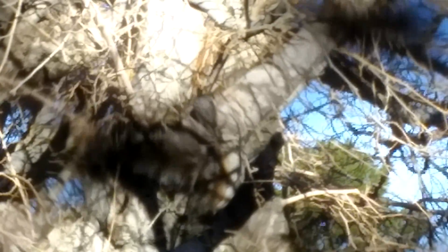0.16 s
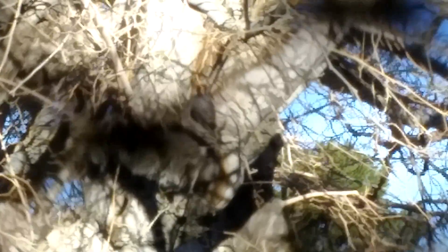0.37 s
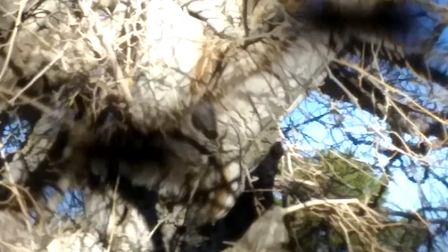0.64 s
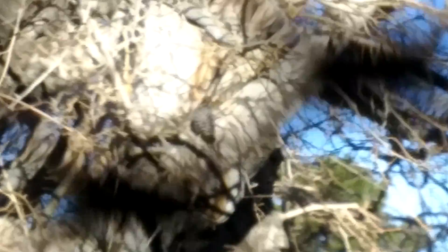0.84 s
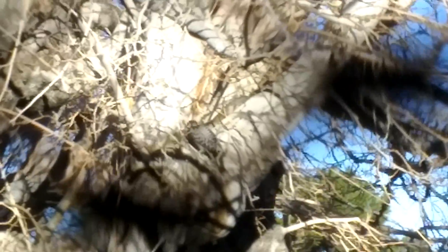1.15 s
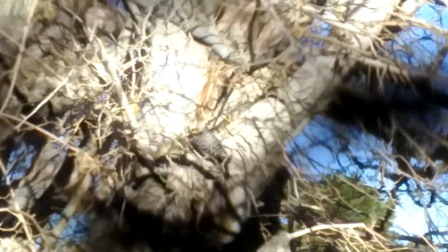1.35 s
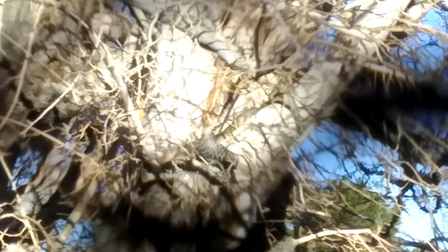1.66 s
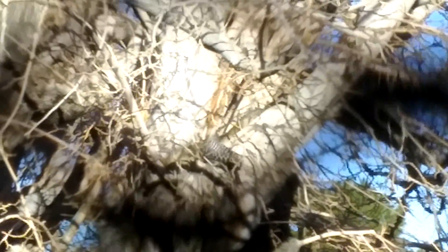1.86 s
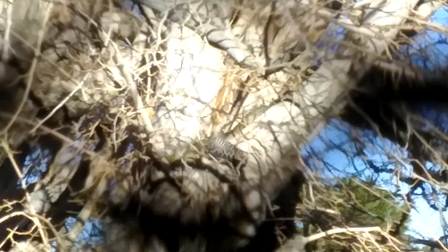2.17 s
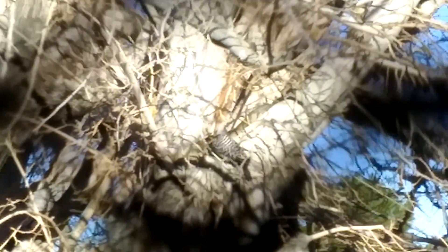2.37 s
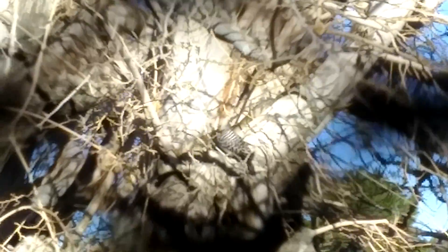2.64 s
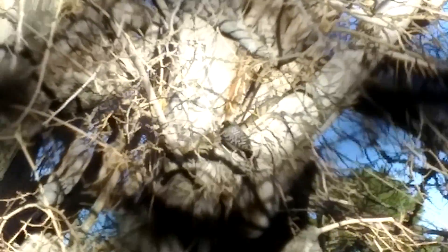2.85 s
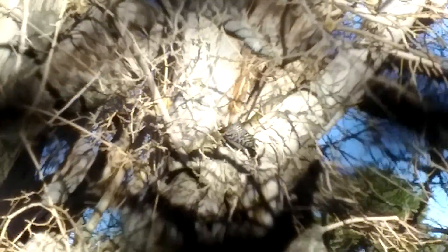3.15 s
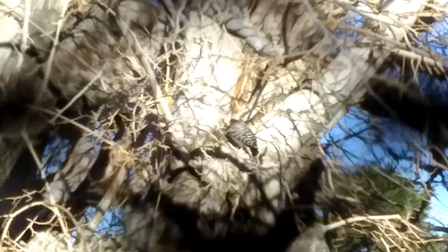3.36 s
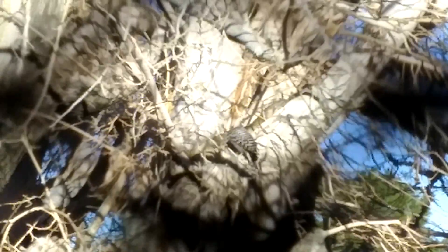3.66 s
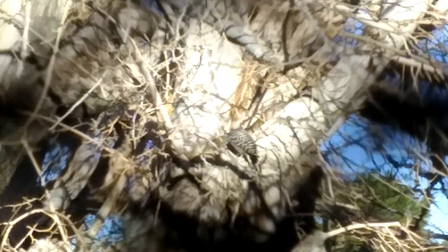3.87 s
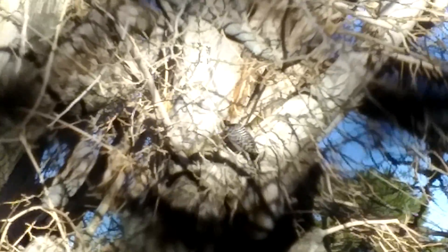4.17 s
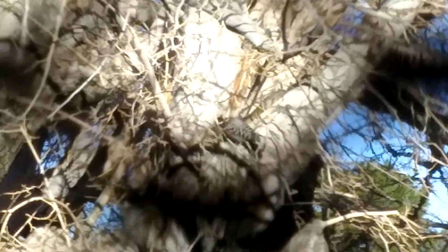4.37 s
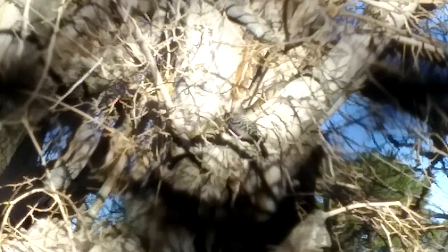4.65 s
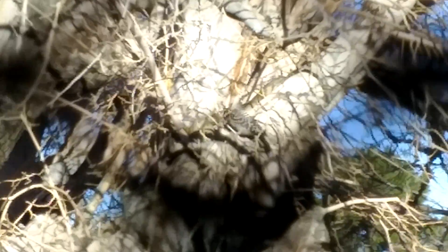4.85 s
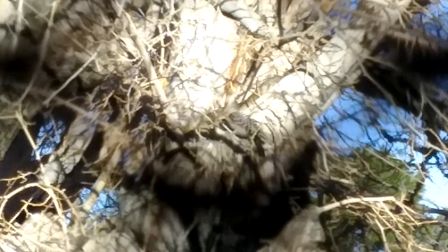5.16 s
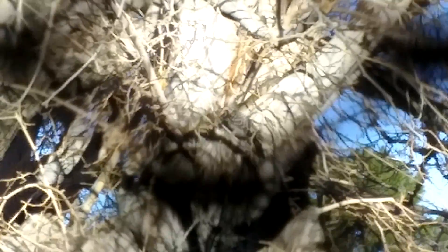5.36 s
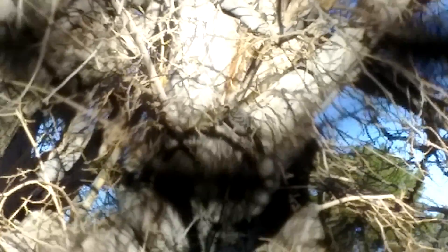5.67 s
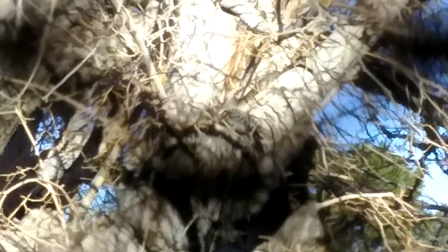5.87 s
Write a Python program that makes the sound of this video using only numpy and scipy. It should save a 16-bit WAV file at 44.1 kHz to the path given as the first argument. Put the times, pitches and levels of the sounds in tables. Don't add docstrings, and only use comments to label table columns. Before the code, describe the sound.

A handheld camera outdoors among bare branches picks up bird chirps some way off, mostly at the start and end. Separate dull wooden pecks, a brief scrape of dry twigs and soft low moans of air come between them. Handling noise on the plastic body peaks in one hard bright click near the middle, over thin hissing air and a faint hum.

```python
import sys
import numpy as np
from scipy import signal
from scipy.io import wavfile
from scipy.ndimage import uniform_filter1d

SR = 44100
rng = np.random.default_rng(int(sys.argv[2]) if len(sys.argv) > 2 else 0)


def to_wav(sig):
    pcm = np.clip(np.atleast_2d(sig), -1, 1) * 32767
    pcm = np.round(pcm).astype(np.int16)
    wavfile.write(sys.argv[1], SR, pcm.T)


def magnitude_from_level(level_db):
    exponent = np.asarray(level_db, float) / 20
    return 10 ** exponent


N = 265173


def songbird():
    direct, far, deep = np.zeros((3, N))
    near_song(direct, deep)
    twisting_calls(direct, deep)
    far_birds(far, deep)
    near = magnitude_from_level(-2) * direct + magnitude_from_level(-5.5) * woodland(direct, t60=.11)
    return near + woodland(far, t60=0.083) + woodland(deep, t60=.17)


# length_share, way_share (first to second pitch), level_db, warble_depth_hz
HOLD_SHAPE = [(0, 0, -10, 15), (.42, .3, 0, 15), (.75, .62, -3, 30), (1, 1, -7, 40)]
HISS_SHAPE = [(0, 0, 2, 800), (.5, 0.68, -1, 700), (1, 0.68, -1, 596)]
SLIDE_SHAPE = [(0, 0.13, -3.5, 50), (.3, .15, -0.5, 100), (.7, .85, -1.5, 120), (1, 0.99, -2, 60)]
TURN_SHAPE = [(0, 0.043, -3, 50.7), (.2, 0.31, 0, 80), (.4, 0.97, -5, 122), (.65, 0.43, -1, 156),
              (.85, -0.097, -2.5, 87.5), (1, -0.56, -32, 80)]
BURR_SHAPE = [(0, 0, -5, 180), (.4, .4, 0, 340), (.75, .8, -1, 340), (1, 1, -4, 250)]
SWELL_SHAPE = [(0, 0.143, -20.5, 40), (.35, 0.3, -3, 111), (.7, .85, 2, 150), (1, 0.74, -5, 120)]
# start_s, length_s, level_db, first_pitch_hz, second_pitch_hz
HOLDS = [(0.122, 0.024, -40, 3080, 3210), (0.196, 0.078, -41.5, 3100, 2970),
         (0.436, 0.028, -44, 3155, 2970), (0.571, 0.035, -44.5, 2990, 3130),
         (0.669, 0.078, -45.5, 3103, 2890), (0.889, 0.037, -43, 3110, 3380),
         (4.906, 0.037, -61, 3710, 3550), (4.958, 0.03, -54.5, 3270, 3050),
         (5.042, 0.035, -45.5, 4350, 4360), (5.169, 0.045, -49, 3777, 3673),
         (5.196, 0.068, -57, 3623, 3650), (5.276, 0.046, -48, 4310, 3990), (5.31, 0.037, -48.5, 3500, 3240),
         (5.38, 0.035, -43.5, 3260, 3000), (5.821, 0.023, -42.5, 4175, 4160),
         (5.854, 0.029, -43.5, 3573, 3210), (5.93, 0.043, -56, 5000, 5030),
         (5.937, 0.05, -48.5, 3737, 3717), (2.91, .024, -48, 5130, 5230), (2.897, .014, -53, 5150, 5200),
         (0.61, 0.02, -53, 3105, 3000), (1.69, .025, -61.5, 3780, 3600), (5.812, .03, -54, 3570, 3500),
         (5.724, 0.0345, -42, 3096, 3520)]
HISSES = [
    (.92, .035, -64, 6400, 7100),
    (.975, .035, -67, 7100, 6700),
    (.925, .028, -71, 9500, 10000),
    (.988, .022, -70, 9900, 9500),
    (2.915, .04, -74, 10500, 11200),
]
HOARSE = [
    (2.9, .035, -58, 5050, 5400),
    (2.955, .06, -57, 4800, 4300),
    (3.03, .05, -60, 3900, 3400),
    (5.53, .05, -54, 4700, 5500),
    (5.56, .08, -49.5, 4300, 3900),
    (5.548, .045, -61, 3000, 2600),
    (5.63, .05, -56, 4100, 3700),
]
SLIDES = [(0, .038, -40, 3120, 3350), (0.08, 0.048, -49, 3070, 2775), (0.25, 0.055, -53.5, 2950, 2000),
          (.285, .045, -58, 2100, 1930), (0.4, 0.04, -54, 2800, 3450), (0.54, 0.04, -51.5, 3190, 2780),
          (0.733, 0.05, -55, 2910, 2010), (0.872, 0.035, -52, 2970, 3500),
          (1.023, 0.046, -48.5, 4110, 2860), (1.075, 0.03, -50, 3140, 3510),
          (1.792, 0.038, -61.5, 3280, 2340), (2.004, 0.12, -67, 4070, 2900),
          (2.236, 0.071, -63.5, 4400, 2370), (2.643, 0.039, -66, 2900, 2300),
          (4.928, 0.027, -55, 3530, 4640), (4.945, .025, -57, 4400, 3200),
          (5.062, 0.072, -55.5, 4075, 3240), (5.262, .03, -56, 2900, 4000), (5.403, .045, -58, 3000, 2320),
          (5.69, 0.029, -45, 3440, 2784), (5.81, 0.021, -55, 3380, 4170), (5.838, .025, -47, 4145, 3500),
          (5.91, 0.019, -57, 4410, 5100), (5.926, 0.032, -50.5, 4600, 3700)]
TURNS = [
    (.435, 0.0318, -48, 3290, 3830),
]
BURRS = [
    (0, .05, -48, 3500, 3400),
    (5.068, .055, -51, 4100, 3600),
    (4.933, .05, -55, 4300, 3900),
    (3.045, .06, -61, 3100, 3000),
    (.98, .04, -54, 3000, 2950),
    (5.292, .045, -51, 4100, 3550),
    (5.34, .05, -52, 3600, 3050),
    (5.508, .045, -49, 3800, 4100),
    (5.525, .04, -48, 4000, 4250),
    (5.53, .05, -54, 4800, 5300),
]
NASALS = [
    (2.878, .058, -52, 2250, 2880),
    (5.485, .04, -62, 2500, 2450),
    (5.525, .05, -57, 2250, 3100),
]


def near_song(direct, deep):
    for shape, notes in ((HOLD_SHAPE, HOLDS), (HISS_SHAPE, HISSES + HOARSE), (SLIDE_SHAPE, SLIDES),
                         (TURN_SHAPE, TURNS), (BURR_SHAPE, BURRS)):
        for row in notes:
            start, note = whistle(syllable(shape, *row), octave_db=-41)
            add(direct, start, note)
            if shape is SLIDE_SHAPE:
                add(deep, start, magnitude_from_level(-9) * note)
    for row in NASALS:
        add(direct, *whistle(syllable(SWELL_SHAPE, *row), octave_db=5.5))


# time_s, pitch_hz, level_db, warble_depth_hz
SQUAWK = [(2.926, 3114, -55, 40), (2.939, 3940, -37, 60), (2.946, 5060, -46, 60), (2.953, 4600, -44, 60),
          (2.961, 3855, -35.5, 50), (2.973, 3340, -47.5, 70), (2.99, 3380, -50, 90)]
SQUAWK_END = [(2.988, 3900, -50, 60), (2.996, 3815, -44, 60), (3.004, 3380, -45, 60),
              (3.015, 3470, -49, 60), (3.027, 3940, -43.5, 70), (3.033, 4170, -50, 70),
              (3.039, 3430, -47, 70), (3.062, 3300, -56, 90)]
RASP = [(5.538, 4320, -50, 120), (5.555, 4520, -39.5, 140), (5.573, 3630, -41, 120),
        (5.585, 3910, -35, 110), (5.597, 4460, -43, 80), (5.63, 4390, -44, 90), (5.66, 4280, -52, 120)]
RASP_END = [(5.59, 4030, -49, 60), (5.605, 3910, -40, 60), (5.625, 3680, -40.5, 80), (5.639, 3565, -43, 90),
            (5.654, 3290, -49.5, 140), (5.685, 3430, -51, 160)]


def twisting_calls(direct, deep):
    for call in (SQUAWK, SQUAWK_END, RASP, RASP_END):
        start, note = whistle(call, octave_db=-43)
        add(direct, start, note)
        add(deep, start, magnitude_from_level(-13) * note)


# start_s, length_s, level_db, first_pitch_hz, second_pitch_hz
FAR_NOTES = [(.005, 0.042, -58, 4480, 3700), (.42, 0.093, -59, 3890, 3630), (.755, 0.1, -54, 2880, 3150),
             (.86, 0.088, -61, 3870, 4180), (.91, 0.029, -53, 3630, 3050), (0.98, 0.037, -61.5, 4200, 4400),
             (1.02, 0.06, -57, 4150, 3930), (1.17, 0.05, -66, 3600, 2240), (1.505, 0.05, -63.5, 3330, 3580),
             (1.63, 0.06, -64, 2900, 2850), (1.601, 0.12, -66.5, 4300, 3680),
             (2.5, 0.062, -66.5, 2800, 2400), (2.77, 0.14, -68, 3560, 3590),
             (2.953, 0.089, -57, 5300, 3950), (2.95, 0.062, -58, 2900, 3000),
             (3.53, 0.068, -64.5, 4200, 3750), (4.37, .07, -62, 4020, 3750),
             (5.548, 0.043, -55.5, 3100, 2580), (5.845, .04, -53, 4130, 3810),
             (4.77, 0.05, -61, 3850, 3730), (4.93, 0.045, -57, 4300, 4550), (5.045, 0.073, -65, 4800, 4530),
             (5.371, 0.065, -58, 4010, 3480), (5.709, 0.027, -50, 4040, 3935)]
# length_share, way_share, level_db, warble_depth_hz
FLICK_SHAPE = [(0, .1, 0, 80), (.13, .2, 2, 120), (.2, .9, -4, 200), (.28, .5, -2, 180), (.36, .1, 1, 120),
               (.46, -.15, -2, 140), (.56, -.4, -13, 160), (.8, -.8, -6, 200), (1, -.6, -13, 200)]
# start_s, length_s, level_db, first_pitch_hz, second_pitch_hz
FLICKS = [
    (1.548, .1, -55, 3500, 4450),
    (2.432, .095, -60, 3500, 4400),
    (3.482, .1, -56, 3500, 4440),
    (4.33, 0.094, -59, 3750, 4400),
]


def far_birds(far, deep):
    for shape, notes, place in ((BURR_SHAPE, FAR_NOTES, far), (FLICK_SHAPE, FLICKS, deep)):
        for row in notes:
            add(place, *whistle(syllable(shape, *row), octave_db=-56))


def syllable(shape, start, length, db, first_hz, second_hz):
    return [(start + share * length, first_hz + way * (second_hz - first_hz), db + shape_db, depth)
            for share, way, shape_db, depth in shape]


def whistle(rows, octave_db):
    t, (hz, db, depth) = curves(rows)
    drift, flutter = (wander(N // 8, smooth)[:len(t)] for smooth in (150, 90))
    rasp = .3 * wander(N // 8, smooth=25)[:len(t)]
    warble_hz = 125.66 * (1 + .35 * drift)
    warble = np.sin(2 * np.pi * np.cumsum(warble_hz) / SR) + rasp
    phase = 2 * np.pi * np.cumsum(uniform_filter1d(hz, size=150) + depth * warble) / SR
    tone = np.sin(phase) + magnitude_from_level(octave_db) * np.sin(2 * phase)
    return t[0], magnitude_from_level(db + 2.5 * flutter) * evened(tone) * signal.windows.tukey(len(t), .36)


def woodland(x, t60):
    taps = np.zeros(SR // 3)
    at = np.arange(60, len(taps) - 30, 30)
    taps[at + rng.integers(0, 30, len(at))] = rng.choice([-1., 1.], len(at))
    t = np.arange(len(taps)) / SR
    decay = magnitude_from_level(-60 * t / t60) + 0.18 * magnitude_from_level(-20 * t / t60)
    taps *= decay * (1 - np.exp(-t / 0.0018))
    return signal.fftconvolve(x, taps / np.linalg.norm(taps))[:len(x)]


# time_s, blow_db, bark_db, scatter_db, top_khz
PECKS = [
    (0.017, -27, -19.5, -13, 3.35),
    (0.505, -44.5, -14, -16, 2.6),
    (0.7464, -30.5, -32, -8, 3),
    (1.107, -56, -28, -16, 4.6),
    (1.216, -53.5, -18, -2, 2),
    (1.327, -27, -19.5, -21, 2.67),
    (3.119, -44, -15, -36, 1.9),
    (4.521, -34.5, -12, -27, 1.86),
    (5.374, -49.5, -13.5, -1, 3.1),
    (5.737, -43, -26, -12, 3.4),
]
# pitch_hz, level_db, t60_s
LIMB = [(803, -15.5, 0.04), (1104, 2.5, 0.02), (1263, -15, 0.025)]
# pitch_hz, level_db, t60_s
BARK = [(1900, -13.5, 0.028), (2240, 3, 0.087), (2900, -1, 0.17), (3500, 4, 0.13), (1600, -38, 0.09)]


def woodpecker():
    out, t = np.zeros(N), np.arange(SR // 5) / SR
    for s, db, bark_db, scatter_db, top_khz in PECKS:
        tune = rng.uniform(0.913, 1.048, 8)
        chatter = rng.standard_normal(len(t)) * (rng.random(len(t)) < .12)
        limb, bark = np.zeros((2, len(t)))
        for (hz, mode_db, t60), k in zip(LIMB, tune):
            limb += magnitude_from_level(mode_db - 60 * t / t60) * np.sin(2 * np.pi * hz * k * t)
        for (hz, mode_db, t60), k in zip(BARK, tune):
            bark += magnitude_from_level(mode_db - 60 * t / t60) * evened(resonate(chatter, hz * k, 650))
        blow = (limb + magnitude_from_level(bark_db) * bark) * (1 - np.exp(-t / 0.0008))
        scattered = blow + magnitude_from_level(scatter_db) * woodland(blow, t60=0.17)
        add(out, s, magnitude_from_level(db) * dull(scattered, 1000 * top_khz))
    return out


# pitch_hz, width_hz, late_ring_strength
TRAPS = [(4000, 205, 2.2), (4000, 205, 2.2), (12250, 60, 1.2)]


def shell():
    out = np.zeros(N)
    finger_thumps(out)
    panel_knocks(out)
    nail_snaps(out)
    for hz, width, strength in TRAPS:
        out = out - strength * resonate(out, hz, width)
    return out - .6 * resonate(out, 8400, 1800)


# time_s, level_db,
# pitch_hz, spread_s
THUMPS = [(0.6772, -33.5, 575, 0.0041), (2.008, -42, 2020, 0.0046), (2.1586, -38, 970, 0.0036),
          (2.1614, -30, 1000, 0.00043), (2.161, -37.5, 246, 0.0017), (2.354, -43.5, 301, 0.019),
          (2.418, -35, 285, 0.0063), (2.42, -42, 710, 0.002), (2.4186, -18, 5500, 0.0003),
          (2.6924, -36, 2300, 0.0008), (2.699, -48, 400, .003), (4.4564, -40, 1490, 0.0052),
          (4.458, -27, 1860, 0.00099), (4.4582, -36, 800, 0.00037), (0.7472, -35, 1030, 0.00072),
          (5.196, -35.5, 267, 0.0028), (5.197, -40, 1976, 0.003)]


def finger_thumps(out):
    for s, db, hz, spread in THUMPS:
        slips = np.diff(slipping(spread), prepend=0)
        width = 300 + 0.38 * hz
        thump = dull(resonate(resonate(slips, hz, width), hz, width), min(4.8 * hz, SR / 3))
        add(out, s, magnitude_from_level(db) * thump / abs(thump).max())


# time_s, level_db, pitch_hz, t60_s
KNOCKS = [(2.4188, -13, 760, .007), (2.4182, -17, 1650, .005), (2.4186, -21, 1150, .007),
          (2.4195, -36, 260, .03), (2.6932, -35, 190, .025), (2.6931, -29.5, 1050, .012),
          (2.6936, -37, 520, .012), (4.4585, -33, 720, .006), (4.4588, -32, 240, .018),
          (2.1612, -38, 240, .015), (5.592, -43, 300, .03), (2.1587, -41, 1000, .02),
          (2.159, -40, 1900, .012), (2.1595, -41, 2850, .012), (2.1619, -30, 4750, .006),
          (.677, -40, 400, .02), (.7465, -40, 480, .02), (.7468, -38, 1400, .012), (5.196, -38, 260, .025),
          (4.459, -38, 400, .015)]


def panel_knocks(out):
    t = np.arange(2000) / SR
    for s, db, hz, t60 in KNOCKS:
        ring = magnitude_from_level(db - 60 * t / t60) * np.sin(2 * np.pi * hz * t)
        add(out, s, thin(ring * (1 - np.exp(-t / .00015)), .4 * hz))


# time_s, snap_db, tick_db, spread_s
SNAPS = [
    (1.497, -41, -62, 0.0022),
    (2.159, -40, -68, 0.0014),
    (2.1618, -32, -48, 0.00011),
    (2.354, -47, -52, 0.013),
    (2.4181, -41, -15.5, 0.00004),
    (2.4184, -0.5, -42, 0.00015),
    (2.693, -39, -76, 0.00064),
    (4.031, -51, -70, 0.0013),
    (4.458, -24.5, -51, 0.00094),
]
# pitch_hz, width_hz, level_db
SNAP_MODES = [(3780, 980, 0), (4050, 1600, 0), (4450, 1240, 0)]
# low_hz, high_hz
TICK_BAND = (10100, 14200)


def nail_snaps(out):
    for s, snap_db, tick_db, spread in SNAPS:
        slips, snap = slipping(spread), np.zeros(2000)
        for k, (hz, width, db) in enumerate(SNAP_MODES):
            snap += (-1) ** k * magnitude_from_level(db) * resonate(resonate(slips, hz, width), hz, width)
        tick = signal.sosfilt(signal.butter(2, TICK_BAND, "band", fs=SR, output="sos"), slips)
        for db, ring in ((snap_db, snap), (tick_db, tick)):
            add(out, s, magnitude_from_level(db) * ring / abs(ring).max())


def slipping(spread):
    slips, (when, size) = np.zeros(2000), rng.random((2, 5))
    slips[(np.clip(when * spread, 0, .03) * SR).astype(int)] = 2 * size - 1
    slips[0] = -1
    return slips


# time_s, level_db
RUSTLE = [
    (.745, -64),
    (.755, -53),
    (.84, -54.5),
    (.974, -60),
    (1.15, -66),
]


def twigs():
    t, (db,) = curves(RUSTLE)
    snaps = (rng.random(len(t)) < 900 / SR) * rng.standard_normal(len(t))
    wood = resonate(resonate(snaps, 730, 1150), 860, 1200) + 1.2 * resonate(snaps, 1440, 120)
    out = np.zeros(N)
    add(out, t[0], magnitude_from_level(db - 1.5) * evened(wood))
    return dull(out, hz=3000)


# start_s, length_s, level_db, first_pitch_hz, second_pitch_hz
MOANS = [
    (1.77, 0.18, -55.5, 219, 252),
    (2.012, 0.037, -54, 353, 355),
    (2.062, 0.12, -55, 403, 422),
    (2.2, .06, -61, 450, 440),
    (3.87, 0.095, -61.5, 453, 482),
    (3.98, 0.18, -57, 436, 463),
]


def moans():
    out = np.zeros(N)
    for row in MOANS:
        t, (hz, db, _) = curves(syllable(SLIDE_SHAPE, *row))
        tone = np.sqrt(2) * np.sin(2 * np.pi * np.cumsum(hz) / SR)
        unsteady = magnitude_from_level(db + 2.8 * wander(len(t), smooth=250))
        add(out, t[0], unsteady * tone * signal.windows.tukey(len(t), .6))
    return out


# pitch_hz, level_db (per Hz)
AIR_COLOUR = [(15, -42), (40, -42), (70, -3.5), (130, 2), (260, -6.5), (400, -9), (900, -13.5), (2000, -16),
              (4500, -18), (6500, -24), (8200, -29.5), (11000, -31.5), (14000, -33.5), (15600, -32)]
# time_s, level_db
GUST = [(0, 5), (.4, 2.5), (.8, 3), (1.2, 3), (1.6, 5), (2.0, 2.8), (2.4, 2.5), (2.8, 3), (3.2, 4),
        (3.6, 2.6), (4.0, 4), (4.25, 2.5), (4.6, 1), (4.9, 6.5), (5.15, 6), (5.25, 1.5), (5.6, 5.5),
        (6.01, 4)]


def air():
    frames, hz = N // 256 + 5, np.fft.rfftfreq(1024, 1 / SR)
    a, b, patches = rng.standard_normal((frames, 513, 3)).T
    patches = evened(uniform_filter1d(uniform_filter1d(patches, size=12, axis=0), size=8, axis=1))
    f, level_db = np.transpose(AIR_COLOUR)
    colour_db = np.interp(np.log(hz + 1), np.log(f + 1), level_db)[:, None]
    hz = hz[:, None]
    swell_db = np.interp(np.arange(frames) * 256 / SR, *np.transpose(GUST))
    swell_db = swell_db / (1 + (hz / 7000) ** 4)
    patch_db = (1.0 + 1.7 / (1 + (hz / 400) ** 2)) * patches
    flicker_db = 0.75 * wander(frames, smooth=1)
    z = (a + 1j * b) * magnitude_from_level(colour_db + patch_db + flicker_db + swell_db)
    z *= hz < 15720
    return magnitude_from_level(-58) * evened(signal.istft(z, nperseg=1024, noverlap=768)[1][:N])


# pitch_hz, level_db
HUM = [(118.4, -75.5), (183.0, -72), (258.4, -71), (296.1, -73.5), (355.3, -77), (527.6, -81),
       (942.1, -68.5), (1297, -80), (1410, -108)]


def drive():
    t, out = np.arange(N) / SR, np.zeros(N)
    for hz, db in HUM:
        level = np.sqrt(2) * magnitude_from_level(db + 0.858 * wander(N, smooth=6000))
        out += level * np.sin(2 * np.pi * (hz * t + rng.random()))
    return out


def evened(x):
    return x / np.sqrt(np.mean(x ** 2) + 1e-20)


def add(mix, s, sound):
    part = mix[round(s * SR):][:len(sound)]
    part += sound[:len(part)]


def resonate(x, hz, width):
    turn, r = np.exp(2j * np.pi * hz * np.arange(len(x)) / SR), np.exp(-np.pi * width / SR)
    return 2 * (turn * signal.lfilter([1 - r], [1, -r], x / turn)).real


def wander(size, smooth):
    return evened(uniform_filter1d(uniform_filter1d(rng.standard_normal(size), smooth), smooth))


def curves(rows):
    s, *columns = np.transpose(rows)
    t = np.arange(s[0], s[-1], 1 / SR)
    return t, [np.interp(t, s, c) for c in columns]


def dull(x, hz):
    return signal.sosfilt(signal.butter(4, hz, fs=SR, output="sos"), x)


def thin(x, hz):
    return signal.sosfilt(signal.butter(2, hz, "high", fs=SR, output="sos"), x)


def scene():
    return (air() + drive() + shell() + woodpecker() + moans() + twigs() + songbird())[None]


def low_pass(x):
    return signal.sosfilt(signal.butter(12, 16360, fs=SR, output="sos"), x)


def record(dry):
    mix = dry - .0007
    return low_pass(mix)


dry = scene()
out = record(dry)
to_wav(out)
```